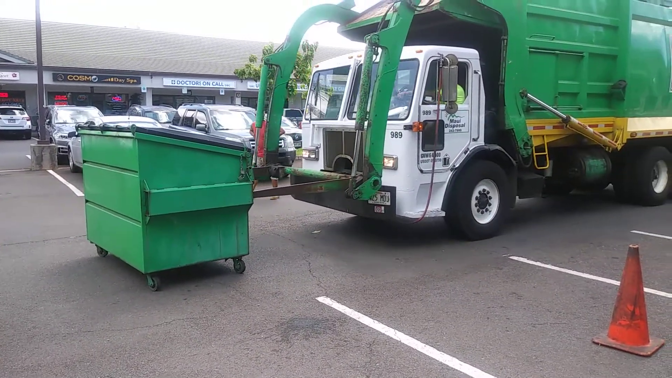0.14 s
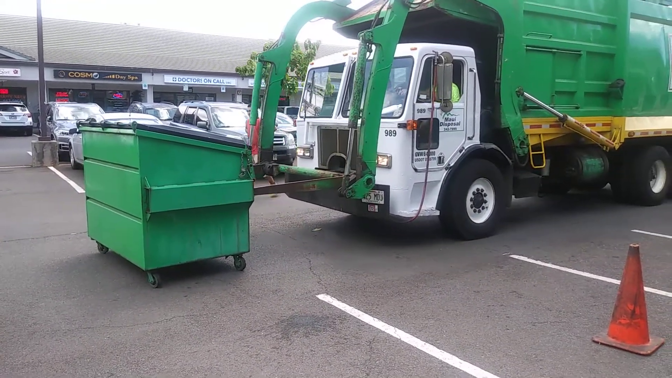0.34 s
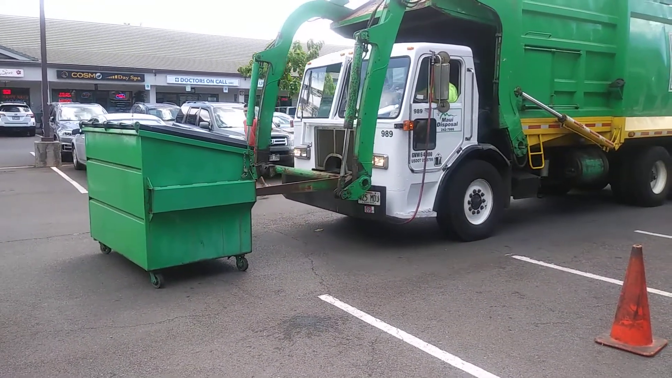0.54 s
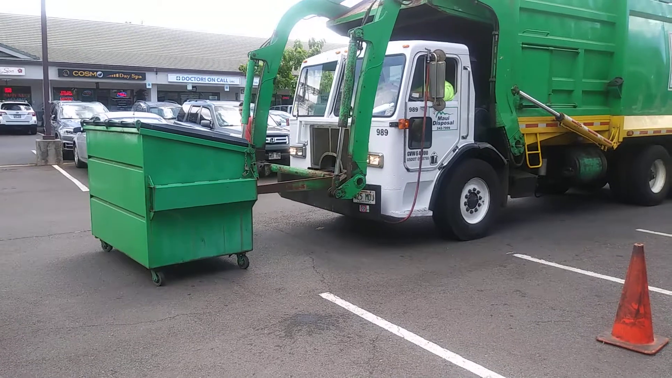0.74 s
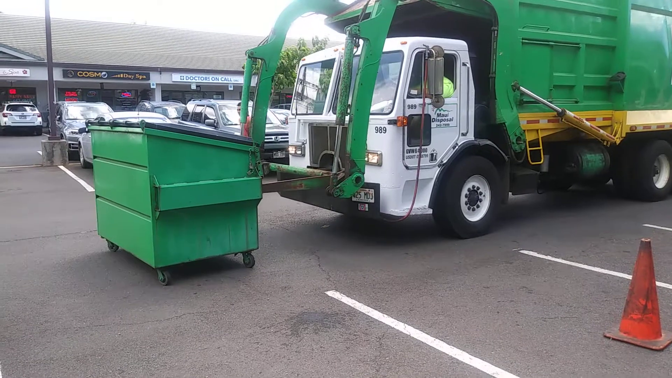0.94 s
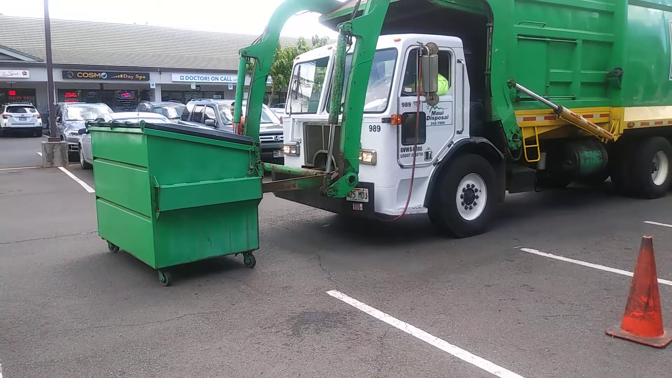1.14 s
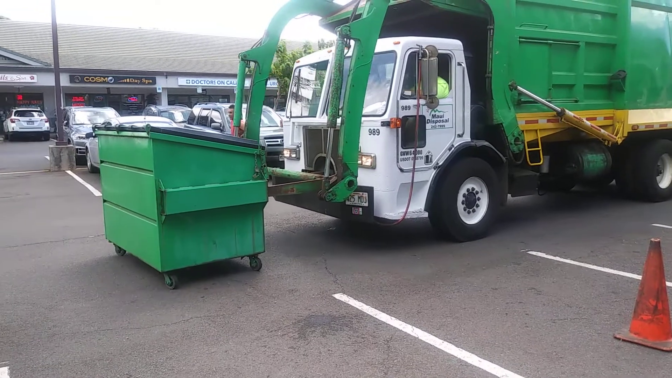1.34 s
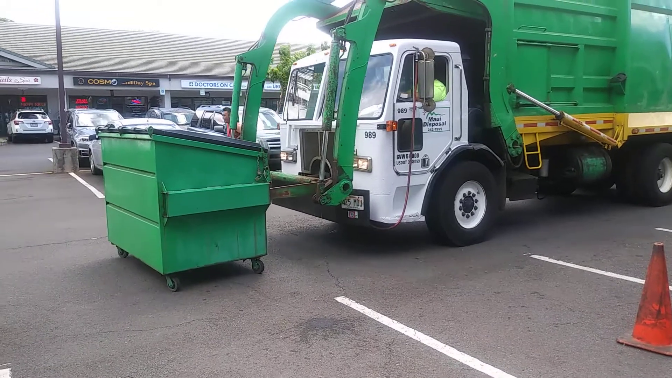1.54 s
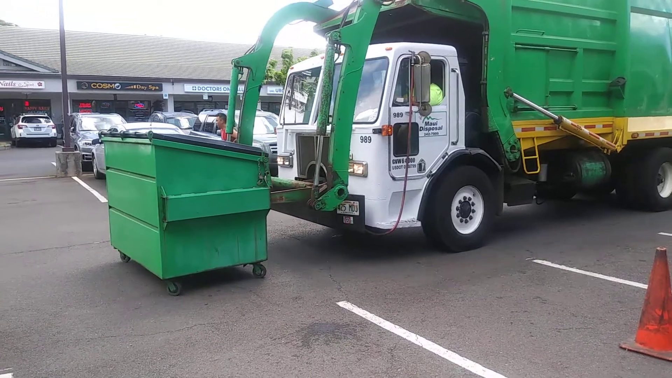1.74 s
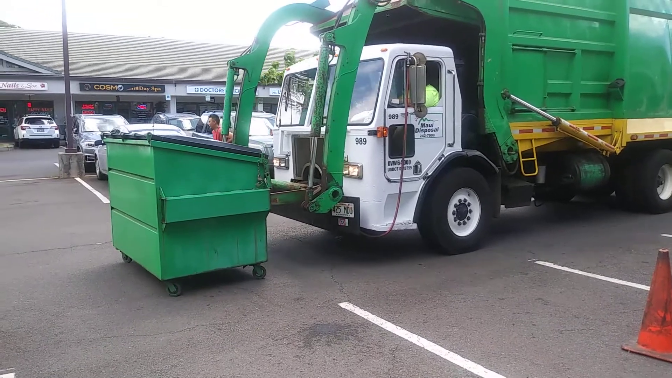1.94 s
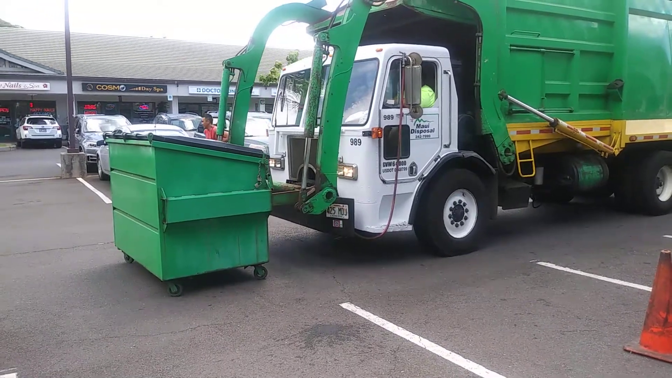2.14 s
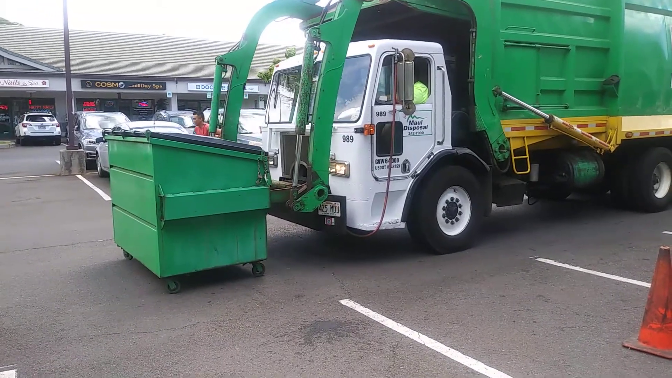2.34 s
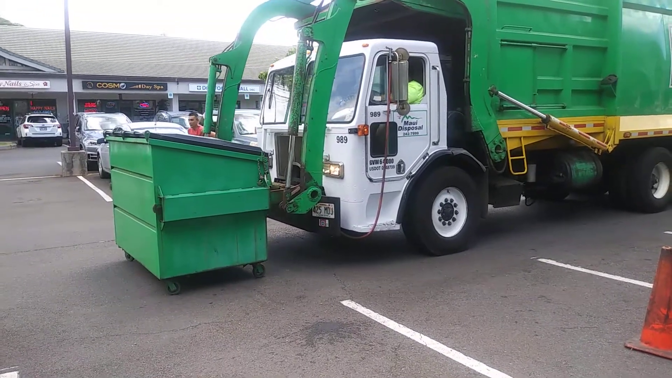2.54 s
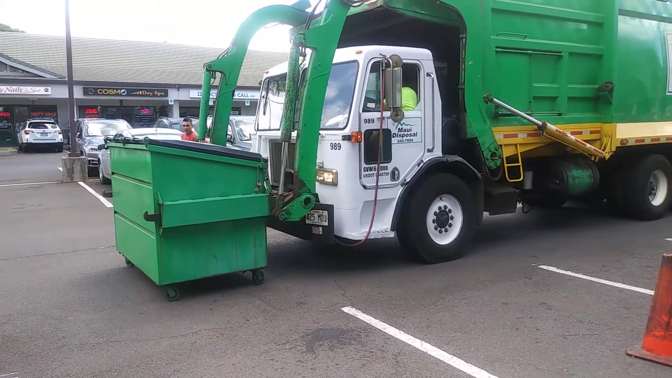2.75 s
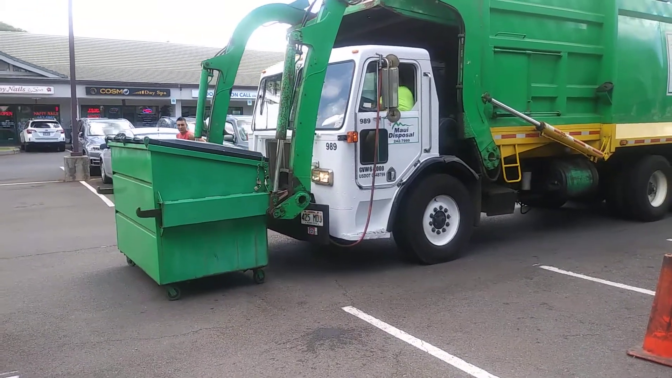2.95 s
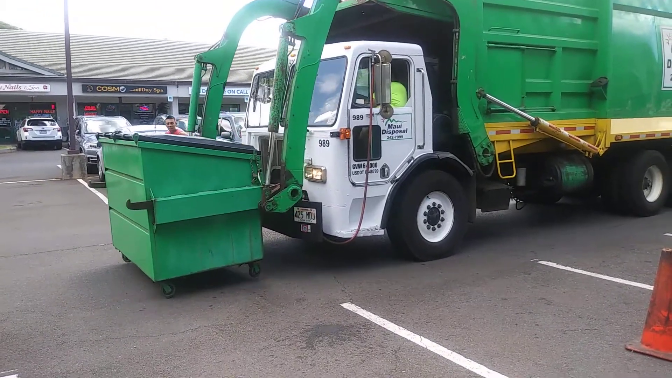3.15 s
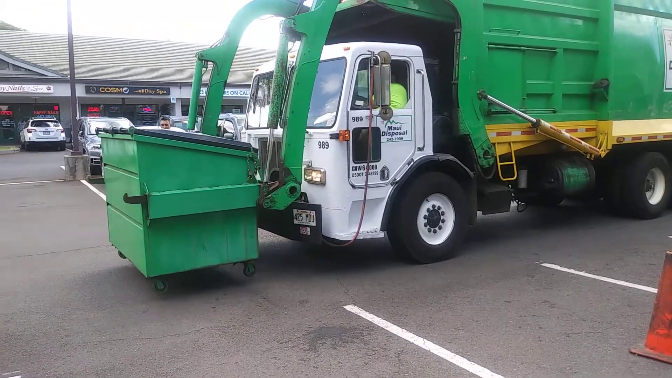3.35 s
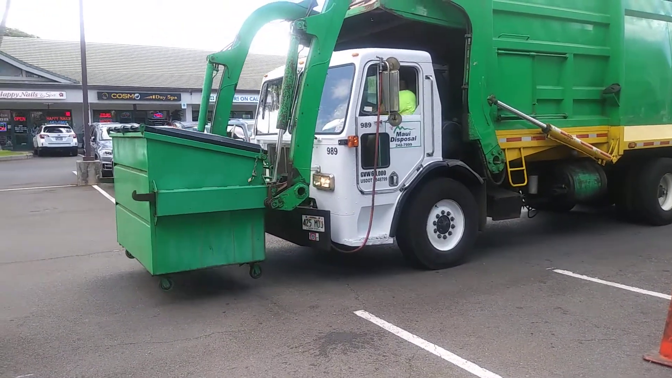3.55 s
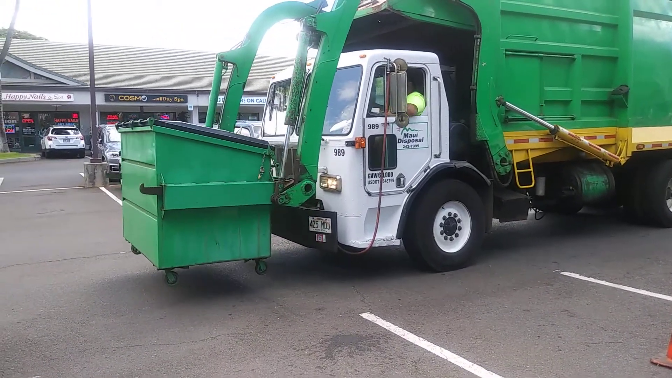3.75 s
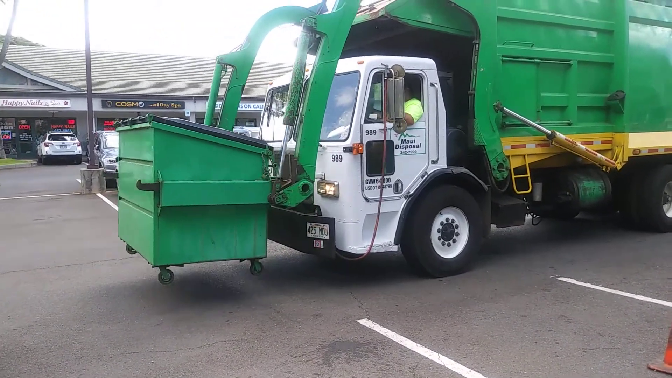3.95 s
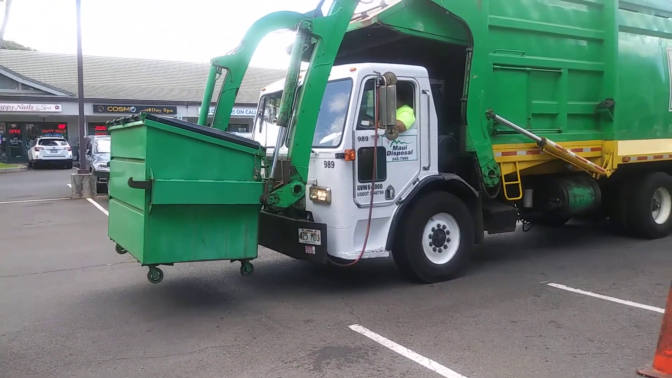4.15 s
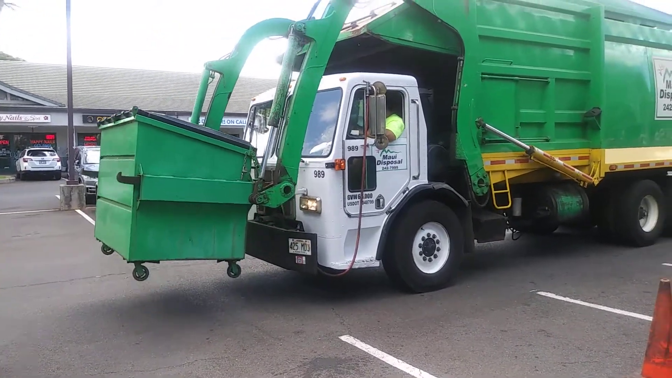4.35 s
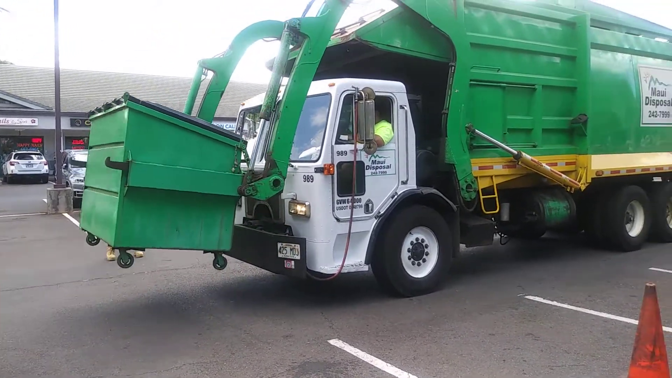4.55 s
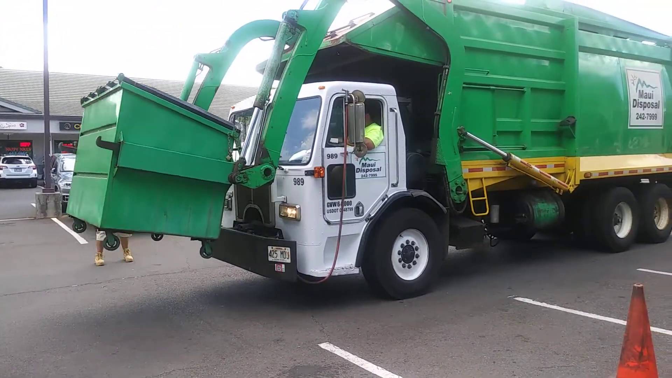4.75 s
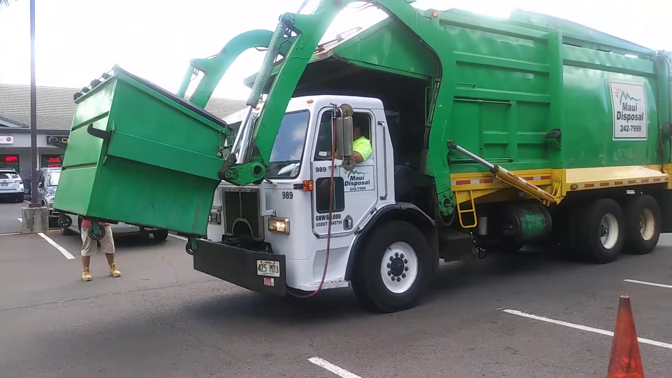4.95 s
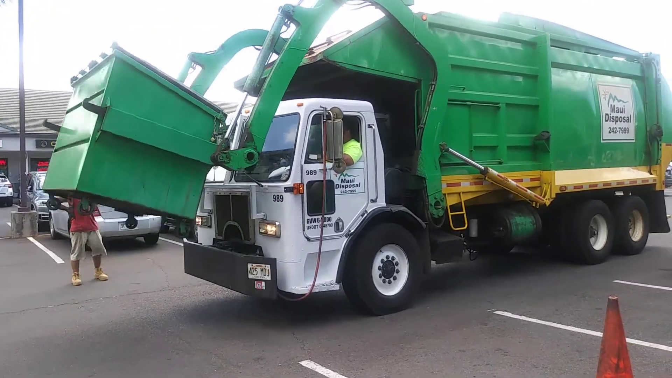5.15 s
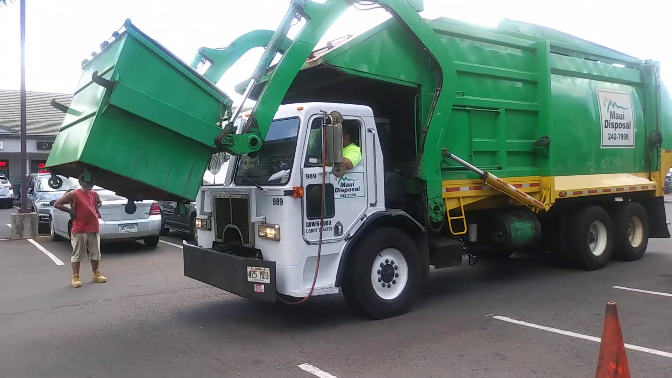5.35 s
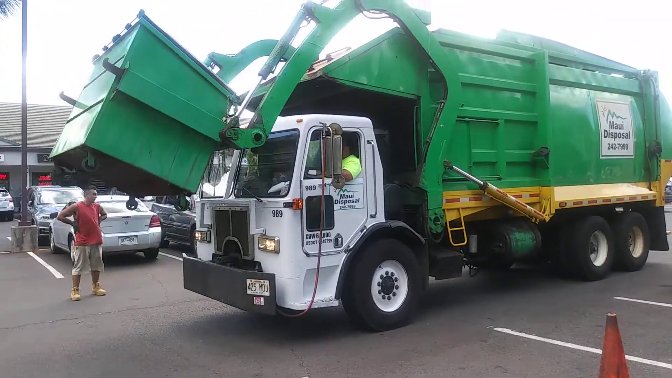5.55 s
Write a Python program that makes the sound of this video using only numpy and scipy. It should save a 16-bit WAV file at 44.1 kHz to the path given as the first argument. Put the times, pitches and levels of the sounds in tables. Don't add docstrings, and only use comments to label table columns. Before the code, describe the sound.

A refuse truck idles with patchy diesel knocks and thin squeals, its forks crash loudly into a steel dumpster, then the engine revs up hard.

```python
import sys
import numpy as np
from scipy import signal
from scipy.io import wavfile
from scipy.ndimage import uniform_filter1d, map_coordinates

SR = 44100
rng = np.random.default_rng(int(sys.argv[2]) if len(sys.argv) > 2 else 0)


def unload_wav(signal):
    wavfile.write(
        sys.argv[1],
        SR,
        np.round(np.clip(np.atleast_2d(signal).T, -1, 1) * 32767).astype(np.int16),
    )


def amplitude_ratio(level_db):
    exponent = np.asarray(level_db, float) / 20
    return 10 ** exponent


N = 246519

IDLE_FIRING_HZ = 31
REV_TAKES_OVER_S = 4.092
MIDDLE_DB = -34

# t/s, level/dB
NEARNESS = [(0, -41.5), (.3, -37), (1.0, -36.5), (1.2, -35), (1.68, -37), (1.76, -33), (2.5, -32.5),
            (2.84, -29.5)]
# t/s, peak level/dB, f/Hz
PANEL_THUDS = [(0.084, -42, 670), (0.23, -25, 574), (0.297, -44, 200), (0.505, -24, 510), (0.526, -25, 443),
               (0.554, -31.5, 580), (0.718, -36, 630), (0.894, -34.5, 213), (1.028, -34, 203),
               (1.329, -37.5, 296), (1.43, -36, 200), (1.863, -32, 523), (2.373, -37, 217)]
# t/s, peak level/dB, f/Hz
BLOCK_KNOCKS = [(0.024, -27, 921), (0.083, -28, 790), (0.147, -25.5, 933), (0.293, -38, 790),
                (0.341, -27, 992), (0.554, -32.5, 940), (0.716, -27, 874), (0.74, -36, 813),
                (0.8, -34, 765), (0.85, -35, 660), (0.906, -39, 790), (0.978, -35, 850), (1.08, -26, 900),
                (1.169, -24.5, 862), (1.351, -52, 850), (1.392, -26.5, 866), (1.474, -27, 912),
                (1.582, -26.5, 885), (1.771, -29, 870), (1.917, -21, 869)]
# t/s, peak level/dB, f/Hz
VALVE_KNOCKS = [(0.0543, -34.5, 2460), (0.3292, -36.5, 2340), (0.5232, -30.5, 2200), (0.8989, -43, 2210),
                (1.086, -31.5, 1980), (1.2744, -37, 1960), (1.4646, -30.5, 2250), (1.6496, -31, 2270),
                (1.6846, -43, 2270), (1.8407, -22, 2146), (2.0338, -24.5, 2110), (2.1675, -48, 2080),
                (2.214, -30, 2170), (2.352, -34, 2240), (2.432, -45, 2260), (2.5272, -26, 2120),
                (2.6674, -24.5, 2130), (2.7162, -24.5, 2200), (2.7796, -39, 1980), (2.862, -9, 2103)]
# t/s, peak level/dB, f/Hz
LOW_CLATTER = [(0.1523, -40, 1520), (0.551, -42, 1155), (0.6125, -42, 1630), (0.8924, -33, 1184),
               (1.3514, -36, 1424), (1.559, -36, 1540), (2.034, -33, 1360), (2.1026, -34.5, 1380),
               (2.2862, -33, 1380), (2.332, -38, 1440), (2.5217, -38, 1530), (2.604, -24, 1470),
               (2.7726, -30, 1383), (2.8639, -14.5, 1540)]
# t/s, firing rate f/Hz
REV_UP = [(4.1, 37.29), (4.5, 41.78), (4.7, 46.14), (4.9, 51.78), (5.0, 57.9), (5.1, 61.7), (5.2, 64.87),
          (5.4, 66.4), (5.59, 67.64)]


def column(rows, k, t):
    rows = np.array(rows)
    return np.interp(t, rows[:, 0], rows[:, k])


def at_hz(points, hz):
    points = np.array(points)
    return np.interp(np.log(hz + 1), np.log(points[:, 0]), points[:, 1])


def power_sum(rows_db):
    return 10 * np.log10(np.sum(amplitude_ratio(np.array(rows_db)) ** 2, axis=0) + 1e-30)


def flutter(s):
    return 1.2 * np.interp(s * 28.0, np.arange(400), rng.standard_normal(400))


def patches(shape, frames):
    grid = rng.standard_normal((shape[0], shape[1] // 4 + 3))
    where = np.meshgrid(np.arange(shape[0]), np.arange(shape[1]) / max(frames, 4), indexing="ij")
    field = map_coordinates(grid, where, order=1)
    return field / field.std()


def fired_noise(phase, depth):
    strength = amplitude_ratio(0.52 * rng.standard_normal(600))[phase.astype(int) % 600]
    burst = strength * np.exp(-3.0 * (phase % 1))
    x = rng.standard_normal(N) * (1 + depth * burst)
    return x / x.std()


def shaped(source, colour, edges, levels, grip_db, frames=11.0, shut=0.98, hold=0.0, tint_db=None):
    size, hop = 512, 128
    hz, t, spec = signal.stft(source, SR, nperseg=size, noverlap=size - hop)
    colour_db = at_hz(colour, hz)[:, None]
    gain = amplitude_ratio(colour_db) * np.ones(len(t))
    if tint_db:
        gain *= amplitude_ratio(tint_db(hz, t))
    strong_db = np.maximum(colour_db - colour_db.max(), -20)
    opening = patches(gain.shape, frames) - shut + hold * strong_db
    gain *= amplitude_ratio(grip_db(t) * np.tanh(4.8 * opening))

    band = np.searchsorted(edges, hz)
    drive_db = np.zeros(gain.shape)
    for k in range(len(edges) + 1):
        power = uniform_filter1d(np.sum(gain[band == k] ** 2, axis=0) / len(hz), size=15)
        drive_db[band == k] = levels(k, t) - 10 * np.log10(power)
    blend = np.exp(-(np.log((hz[:, None] + 1) / (hz + 1)) / 0.21) ** 2)
    gain *= amplitude_ratio(blend @ drive_db / blend.sum(axis=1)[:, None])
    return signal.istft(spec * gain, SR, nperseg=size, noverlap=size - hop)[1][:N]


def bursts(events, width_hz, t60):
    lead_s = 0.004
    out, t = np.zeros(N + SR), np.arange(int(.2 * SR)) / SR
    fade = amplitude_ratio(-60 * (t / t60) ** 2) * np.hanning(2 * len(t))[len(t):]
    r = np.exp(-np.pi * width_hz / SR)
    for s, peak_db, hz in events:
        puff = rng.standard_normal(len(t)) * fade
        for _ in range(2):
            puff = signal.lfilter([1, 0, -1], [1, -2 * r * np.cos(2 * np.pi * hz / SR), r * r], puff)
        out[round((s - lead_s) * SR):][:len(t)] += amplitude_ratio(peak_db) * puff / np.abs(puff).max()
    return out[:N]


def car_park_floor():
    # f/Hz, level/dB per Hz
    floor_colour = [(60, -33), (110, -19), (160, -5), (600, -18), (900, -8), (1500, -3), (2600, -14),
                    (3200, -6), (3800, -13), (5200, -21), (7000, -42), (15500, -43)]

    def traffic_db(hz, s):
        return 5 * np.outer(hz < 330, np.tanh((1.55 - s) / .1))

    return shaped(rng.standard_normal(N), floor_colour, (), lambda k, s: -47.5, lambda s: 1.5,
                  tint_db=traffic_db)


def idle_level(k, s):
    rest_level_db = (-53, -45.5, -46.5, -31.5)[k]
    follows = (-.6, 0.05, 1, 1)[k]
    flutter_db = (2.4, 3.1, 3.7, 1.75)[k]
    nearness_db = column(NEARNESS, 1, s)
    rest_db = rest_level_db + follows * (nearness_db - MIDDLE_DB) + flutter_db * flutter(s)
    if k == 1:
        for start, end in [(0.139, 0.198), (0.971, 1.72), (1.91, 2.76)]:
            rest_db = rest_db + 6.5 * ((s > start) & (s < end))
    if k == 3:
        through = (s - 0.32) * IDLE_FIRING_HZ / 6 % 1
        return rest_db - 0.76 * through * np.maximum(-28.5 - nearness_db, 0)

    knocks = (PANEL_THUDS, BLOCK_KNOCKS, VALVE_KNOCKS + LOW_CLATTER)[k]
    opened_db = (-9.5, -10, -9)[k]
    closes_db_per_s = (166, 330, 200)[k]
    levels = [rest_db]
    for at, peak_db, _ in knocks:
        slope = np.where(s > at, closes_db_per_s, 2000)
        levels.append(peak_db + opened_db - slope * np.abs(s - at))
    return power_sum(levels)


def idle():
    # f/Hz, level/dB per Hz
    idle_colour = [(100, -26.5), (200, -37), (640, -8), (840, 17), (1080, -7), (1430, -14), (1780, -19.5),
                   (2200, -2), (2600, -25.5), (2850, 4), (3420, 3), (3750, -40.5), (5150, -16.5),
                   (6500, -89)]
    # f/Hz, level/dB per Hz
    streak_colour = [(3500, -30), (5800, 0), (8000, -3), (10000, -11), (13000, -14), (15500, -15)]

    def streak_level(k, s):
        return -75.5 + 6.5 * s + 0.1 * (column(NEARNESS, 1, s) - MIDDLE_DB)

    t = np.arange(N) / SR
    source = fired_noise(IDLE_FIRING_HZ * t, depth=0.76)
    leak = shaped(source, idle_colour, (650, 1150, 2550), idle_level,
                  lambda s: 11.0 - 1.8 * s, frames=26.0, shut=-.25, hold=.06)
    streaks = shaped(rng.standard_normal(N), streak_colour, (), streak_level,
                     lambda s: 12.0, frames=30.0, shut=1.4)
    return (leak + streaks) * np.clip((2.88 - t) / 0.015, 0, 1)


def squeals():
    # start t/s, end t/s, start f/Hz, end f/Hz, level/dB
    whistles = [(.02, .08, 14250, 14200, -72), (.13, .22, 12950, 12900, -76), (.21, .48, 12500, 12380, -66),
                (.62, .92, 12750, 12850, -76), (.6, 1.2, 7600, 7900, -71), (1.42, 1.85, 7650, 7600, -73),
                (1.94, 2.04, 14600, 14600, -76), (2.03, 2.26, 14300, 14450, -64),
                (2.13, 2.3, 13600, 13550, -76), (2.05, 2.42, 8650, 8750, -58),
                (2.52, 2.66, 8950, 9000, -66), (2.64, 3.0, 13250, 13500, -66),
                (2.62, 2.85, 8150, 8050, -66), (1.91, 2.76, 860, 830, -35), (.89, .97, 4500, 4490, -52),
                (2.2, 2.37, 5150, 5100, -52), (2.47, 2.66, 5080, 5150, -50), (4.11, 4.21, 1400, 1400, -30),
                (4.22, 4.85, 850, 1020, -27), (3.12, 3.35, 14450, 14400, -72),
                (3.52, 3.57, 14200, 14200, -60)]
    out = np.zeros(N)
    for start, end, from_hz, to_hz, level_db in whistles:
        waver = rng.standard_normal((2, 140))
        t = np.arange(round(start * SR), round(end * SR)) / SR
        u = (t - start) / (end - start)
        wobble = np.interp((t - start) * 25, np.arange(140), waver[0])
        grain = .6 + np.interp((t - start) * 150, np.arange(140), waver[1])
        hz = from_hz + (to_hz - from_hz) * u + 25 * wobble
        envelope = np.minimum(u / .1, 1) * (1 - u) ** .4 * amplitude_ratio(level_db + 4) * grain
        out[round(start * SR):][:len(t)] += envelope * np.sin(2 * np.pi * np.cumsum(hz) / SR)
    return out


def knocks_and_pings():
    # t/s, peak level/dB, f/Hz
    steel_pings = [(0.2404, -49, 4560), (0.334, -52, 3690), (0.4135, -37, 3426), (0.8927, -40, 4480),
                   (1.2984, -52, 5250), (1.8632, -45, 4370), (2.0228, -45, 3880), (2.146, -58, 4670),
                   (2.2124, -43, 5080), (2.39, -47, 5200), (2.5202, -46, 4900), (2.6873, -37, 5140),
                   (2.7726, -38, 5130), (2.8589, -27, 3770)]
    block = bursts(BLOCK_KNOCKS, width_hz=119, t60=0.04)
    valves = bursts(VALVE_KNOCKS, width_hz=127, t60=0.094)
    panels = bursts(PANEL_THUDS, width_hz=168, t60=0.037)
    clatter = bursts(LOW_CLATTER, width_hz=88, t60=0.11)
    return block + valves + panels + clatter + bursts(steel_pings, width_hz=39, t60=0.059)


def cracks():
    # t/s, peak level/dB
    fork_blows = [
        (2.858, -23),
        (3.023, -8.5),
        (3.352, -16),
        (3.42, -27),
        (3.5318, -26),
        (3.8197, -30),
        (3.8764, -42),
    ]
    out, t = np.zeros(N + SR), np.arange(int(.12 * SR)) / SR
    for s, peak_db in fork_blows:
        noise = rng.standard_normal(len(t))
        out[round(s * SR):][:len(t)] += amplitude_ratio(peak_db - 11.5) * noise * amplitude_ratio(-60 * t / 0.14)
    return signal.sosfilt(signal.butter(3, [3600, 9000], "band", fs=SR, output="sos"), out[:N])


def crash_level(k, s):
    # t/s, roar level/dB, ring t/s, boom re roar level/dB, brightness level/dB
    crashes = [
        (2.865, -15.5, 0.084, -10, 3.5),
        (2.931, -15.5, 0.15, -13, 3.5),
        (3.023, -16.5, 0.19, -3.5, 6.5),
        (3.279, -21, 0.11, -8, 6),
        (3.352, -14, .58, -16.5, 12.5),
        (3.527, -19.5, 0.27, -34, 13),
        (3.817, -19.5, 0.062, -38, 6.5),
        (3.876, -20.5, 0.13, -26, 4.5),
    ]
    steel_db = (2.1, -0.2, -6.5, -36.5)[k]
    bright_share = (0.01, 0.013, 0.12, 1)[k]
    flash_share, flash_s = (0.01, 0.01, 0.74, .6)[k], 0.033
    attack_s = (.05, .009, .004, .003)[k]
    sag_db_per_s, bend_db_per_s2 = (3, 4, 14, 25)[k], (66, 9, 1.4, 6.2)[k]
    release_db_per_s = (40, 118, 130, 120)[k]
    rows = []
    for at, level_db, rings, boom_db, bright_db in crashes:
        age = np.maximum(s - at, 0)
        attack_db = 20 * np.log10(np.clip(age / attack_s, 1e-5, 1))
        sag_db = sag_db_per_s * age + bend_db_per_s2 * age ** 2
        release_db = release_db_per_s * np.maximum(age - rings, 0)
        edge_db = bright_db * (bright_share + flash_share * np.exp(-age / flash_s))
        colour_db = steel_db + boom_db * (k == 0) + edge_db
        rows.append(level_db + colour_db + attack_db - sag_db - release_db)
    return power_sum(rows)


def rev_level(k, s):
    full_db, gap_db = (-33, -19.5, -21.5, -41.5)[k], (36, 12, 7.2, 14)[k]
    rise_s, growth_db_per_s = (0.039, 0.25, 0.062, 0.01)[k], (0.83, 0.7, 0.27, 1.6)[k]
    age = s - REV_TAKES_OVER_S
    rising_db = growth_db_per_s * age - gap_db * np.exp(-np.maximum(age, 0) / rise_s)
    return full_db + rising_db + 600 * np.minimum(age, 0)


def steel_and_roar():
    # f/Hz, level/dB per Hz
    work_colour = [(59, -65), (100, -48), (264, -16), (319, -3.5), (362, -20.5), (394, -9.5), (614, -5.5),
                   (956, 1.5), (1260, 6), (2520, -3.5), (2990, -8), (4460, -9.5), (7100, -19), (11100, -24),
                   (15500, -35.5)]
    # f/Hz, width f/Hz, level/dB
    body = [(870, 90, 4), (1007, 60, 11.5), (1255, 38, 4.5), (1440, 34, 0.5), (1585, 41, 5.5),
            (1685, 68, 3.5), (1980, 130, 5), (2745, 175, 5.5), (3130, 120, 5.5), (4260, 76, 5.5)]
    # f/Hz, level/dB
    crash_tint = [(180, -14), (280, 3), (420, -11.5), (600, -5.5), (1100, 3), (2000, 0.5), (4000, 1),
                  (8000, 8), (11000, -5.5), (15000, -4)]
    # f/Hz, level/dB
    valleys = [(200, -10), (480, 11.5), (620, -10), (850, 6), (1100, -22), (1450, 1), (1720, -18.5),
               (2100, 0.5), (2400, 7.5), (2650, -17), (2900, 17), (3400, 15), (3900, 5.5), (5200, 3.5)]
    # start, attack, hold, release t/s
    scrape = (3.45, .08, .1, .22)

    def levels(k, s):
        rev_db = rev_level(k, s) + (2.2, .4, .6, 1.1)[k] * flutter(s)
        return power_sum([crash_level(k, s), rev_db])

    def grip(s):
        heard_db = power_sum([crash_level(1, s), rev_level(1, s) + 8])
        least = np.where(s < REV_TAKES_OVER_S, 0.19, .1)
        return np.clip((-11 - heard_db) / 13, least, 1)

    def tint_db(hz, s):
        body_db = sum(level_db / (1 + (2 * (hz - at) / width_hz) ** 2) for at, width_hz, level_db in body)
        scraping = np.interp(s, np.cumsum(scrape), [0, 1, 1, 0])
        steel = (s < REV_TAKES_OVER_S) * (1 - scraping)
        crash_db = np.outer(at_hz(crash_tint, hz), steel)
        return body_db[:, None] + crash_db + np.outer(at_hz(valleys, hz), grip(s))

    t = np.arange(N) / SR
    phase = np.cumsum(column(REV_UP, 1, t)) / SR
    cycle = np.interp(phase / 2 % 1 * 400, np.arange(401), rng.standard_normal(401))
    source = fired_noise(3 * phase, depth=.2) + .66 * cycle * (t > REV_TAKES_OVER_S)
    return shaped(source, work_colour, (650, 2500, 6000), levels,
                  lambda s: 11.0 * grip(s), frames=36.0, shut=-1.3, hold=.08, tint_db=tint_db)


def engine_tones():
    # multiple of firing rate, level/dB, emerging t/s
    orders = [
        (3, -13, 5.2),
        (5, 0, 4.7),
        (6, -1, 5.2),
        (18.55, 1, 5.25),
        (26, -4, 5.2),
        (65, -10, 5.15),
    ]
    t = np.arange(N) / SR
    firing_hz = column(REV_UP, 1, t)
    phase = np.cumsum(firing_hz) / SR
    tones = np.zeros(N)
    for multiple, level_db, start in orders:
        waver = rng.standard_normal(120)
        rise = np.clip((t - start) / .15 + .5, 0, 1)
        unsteady_db = np.log(multiple) * np.interp(t * 20, np.arange(120), waver)
        tones += rise * amplitude_ratio(level_db + unsteady_db) * np.sin(2 * np.pi * multiple * phase)
    tone_db = -29 - .62 * np.maximum(64.65 - firing_hz, 0)
    return np.sqrt(2) * amplitude_ratio(tone_db) * tones


def scene():
    truck = idle() + squeals() + knocks_and_pings()
    lift = cracks() + steel_and_roar() + engine_tones()
    return (car_park_floor() + truck + lift)[None]


def low_pass(x):
    return signal.sosfilt(signal.butter(12, 15640, fs=SR, output="sos"), x)


def record(dry):
    # f/Hz, width f/Hz
    cavity_dips = [
        (7100, 380),
        (9450, 310),
    ]
    x = signal.sosfilt(signal.butter(6, 135, "high", fs=SR, output="sos"), dry)
    shaved = x / (1 + np.abs(x / .5) ** 12) ** (1 / 12) - x
    x = x + signal.sosfiltfilt(signal.butter(2, 7000, fs=SR, output="sos"), shaved)
    for hz, width_hz in cavity_dips:
        x = signal.lfilter(*signal.iirnotch(hz, hz / width_hz, SR), x)
    rumble_band = signal.butter(1, [35, 90], "band", fs=SR, output="sos")
    rumble = signal.sosfilt(rumble_band, rng.standard_normal(x.shape))
    mix = x + amplitude_ratio(-89) * rumble / rumble.std()
    return low_pass(mix)


dry = scene()
out = record(dry)
unload_wav(out)
```